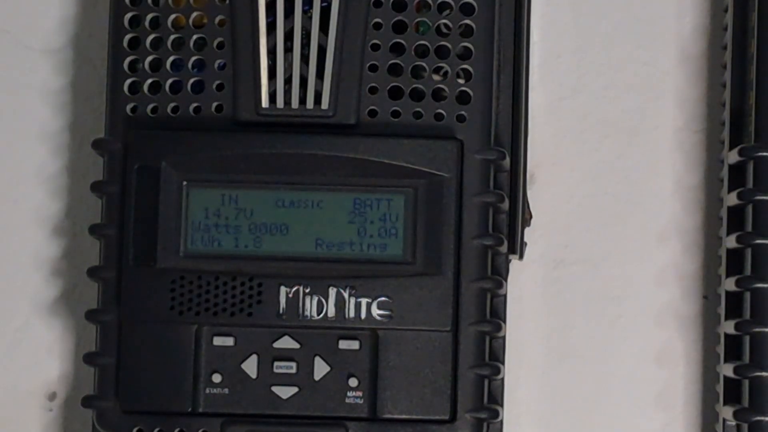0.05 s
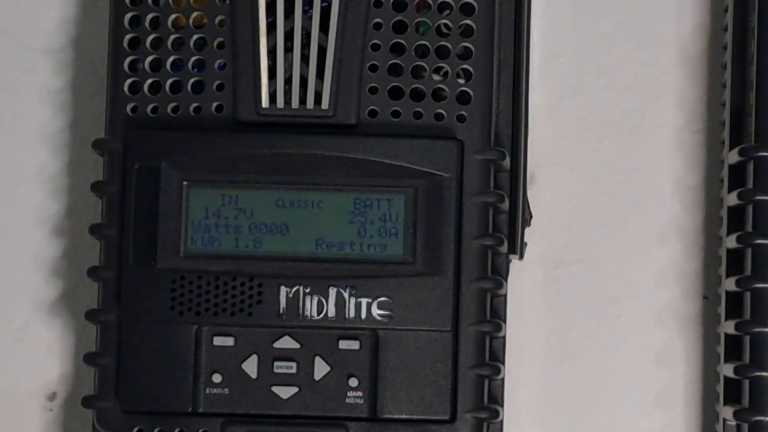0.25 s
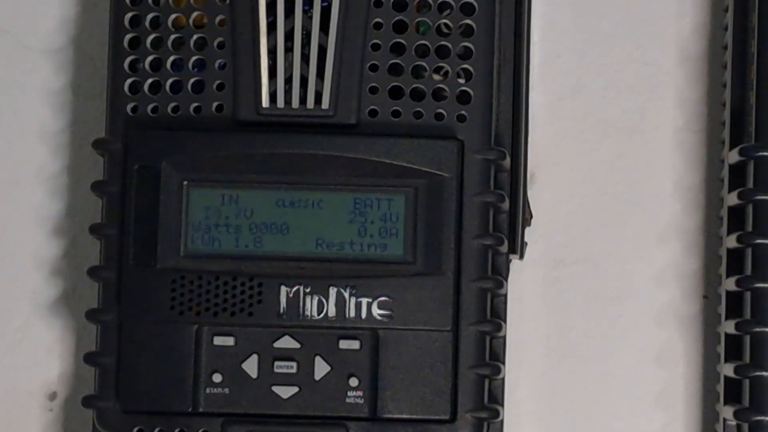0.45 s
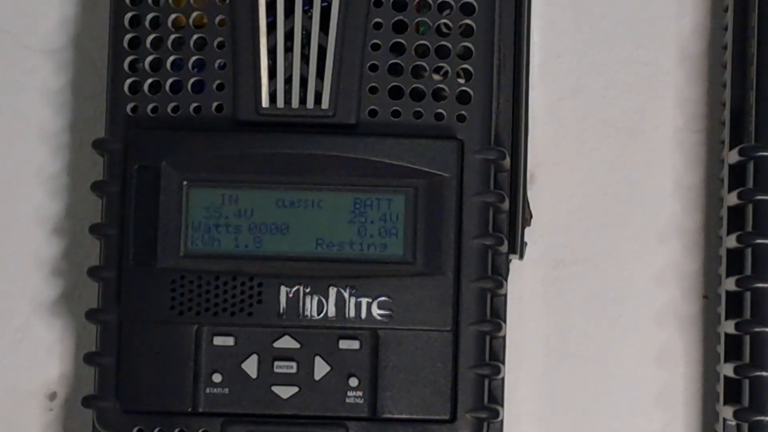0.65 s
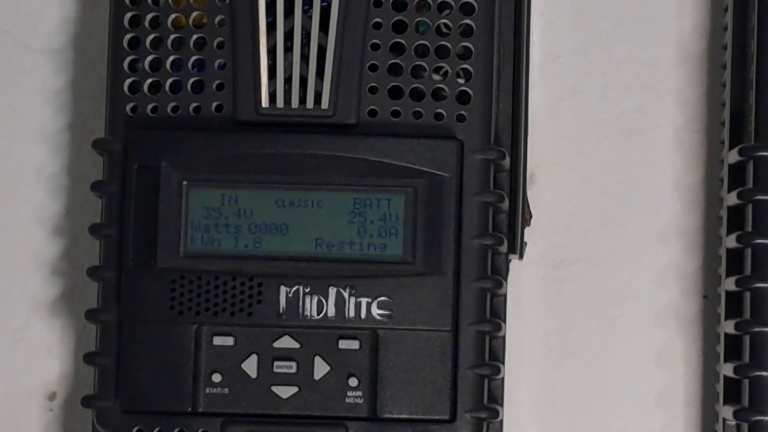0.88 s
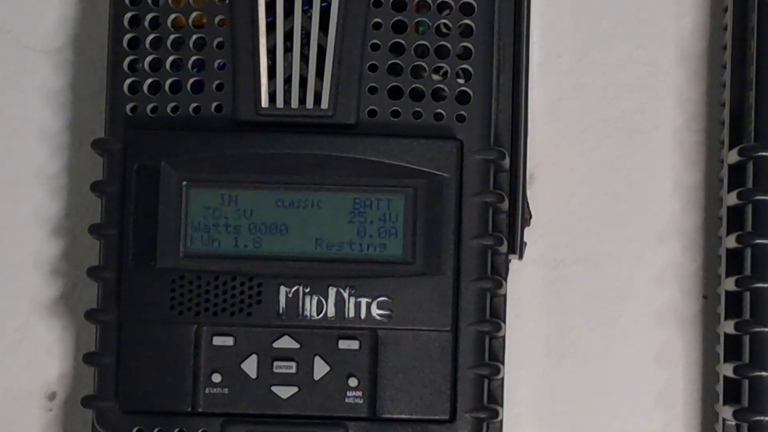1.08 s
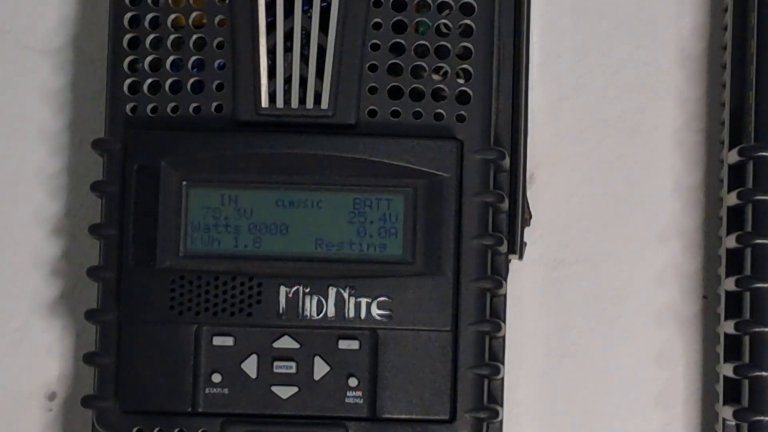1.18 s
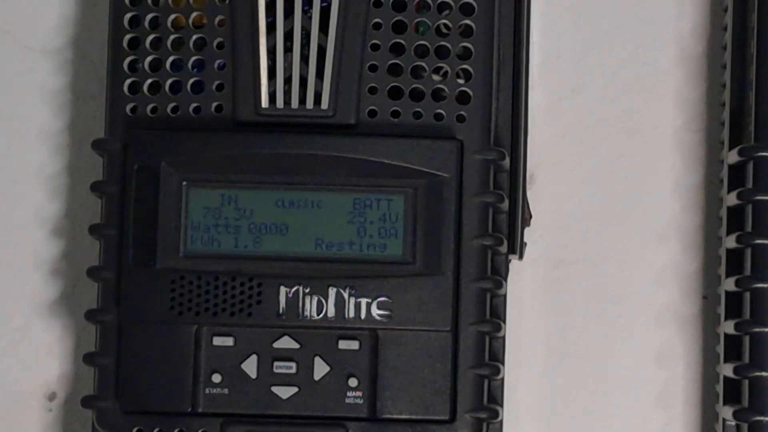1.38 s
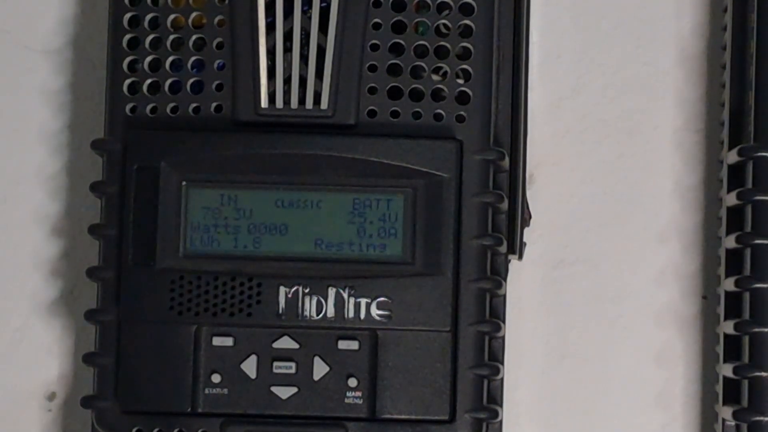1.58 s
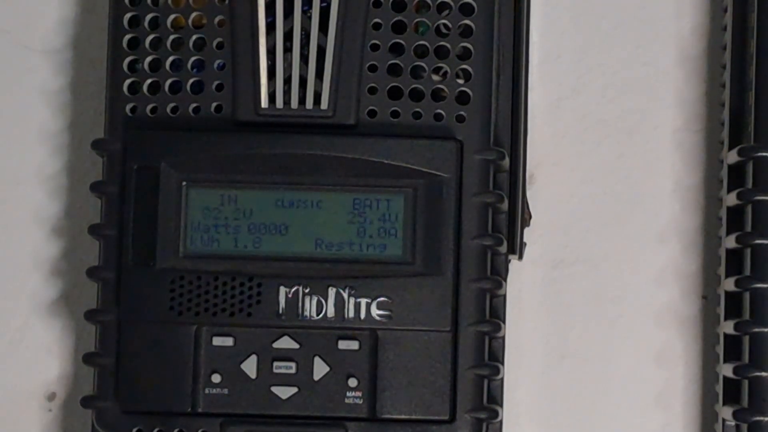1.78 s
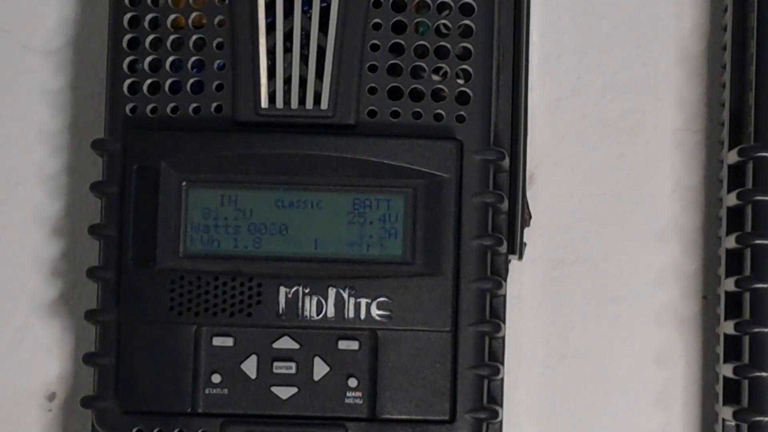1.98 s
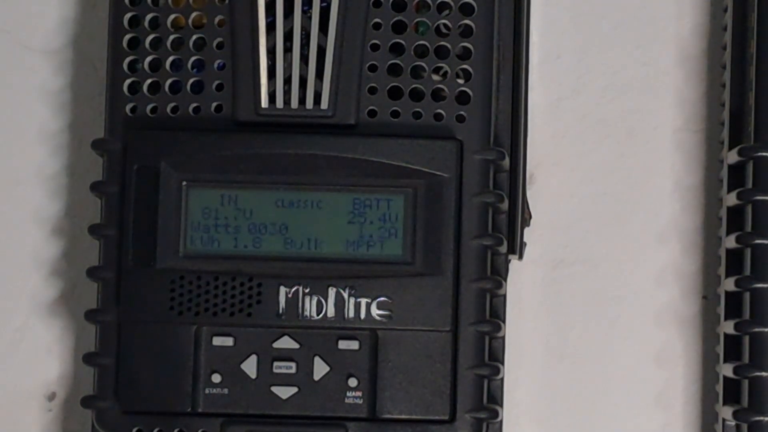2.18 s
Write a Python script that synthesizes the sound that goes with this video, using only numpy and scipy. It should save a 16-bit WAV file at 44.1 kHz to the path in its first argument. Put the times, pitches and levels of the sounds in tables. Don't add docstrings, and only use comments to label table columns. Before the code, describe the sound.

Heavy electrical breakers snapped over with loud metallic clacks in a bare, echoing utility room

```python
import sys
import numpy as np
from scipy import signal
from scipy.fft import rfft, irfft
from scipy.io import wavfile
from scipy.ndimage import uniform_filter1d

SR = 44100
rng = np.random.default_rng(int(sys.argv[2]) if len(sys.argv) > 2 else 0)


def volts_from_decibels(level):
    exponent = np.asarray(level, float) / 20
    return 10 ** exponent


def generate_wav(sig):
    pcm = np.round(np.clip(np.atleast_2d(sig).T, -1, 1) * 32767).astype(np.int16)
    wavfile.write(sys.argv[1], SR, pcm)


N = 99225

# (frequency [Hz], density [dB per Hz])
FAN_COLOUR = [(60, -3.5), (110, -9.5), (400, -24.5), (1500, -34), (7600, -45.5), (8300, -51.5),
              (12500, -44), (15800, -38), (16300, -86)]
# (frequency [Hz], left minus right [dB])
FAN_LEFT = [(60, -10), (240, -8.5), (950, 0.5), (3770, -3.5), (15000, -3)]
# (frequency [Hz], level [dB])
WHINE_TONES = [(11881, -78), (12000, -64), (12119, -78), (59.5, -63)]
# (frequency [Hz], density [dB per Hz])
SNAP_COLOUR = [(800, 6.5), (1300, -1.5), (2000, -2), (2500, -7), (7400, -3.5), (8100, -9.5), (10500, -3.5),
               (15700, -2), (16000, -35)]
# (frequency [Hz], width [Hz], level [dB])
LEVERS = [(1360, 573, 8.5), (1850, 69, -17.5), (2420, 390, 8.5), (2645, 230, -3), (3220, 240, -6.5),
          (3620, 1000, -1), (4540, 190, -5.5), (5360, 240, -4), (6560, 1500, -3), (7220, 190, -9.5),
          (12300, 3000, -8.5)]
# (time [s], level [dB], band from [Hz], band to [Hz], room send
# [dB])
SNAPS = [(0.084, -52, 600, 6300, 0.5), (0.2266, -4.5, 3230, 17200, 1.5), (0.445, -14.5, 2000, 16850, -3),
         (0.5037, -18, 2020, 16540, -0.5), (0.5081, -17.5, 4200, 16540, -15),
         (0.512, -24, 2000, 5200, -5.5), (0.792, -35.5, 1500, 6600, -3), (0.916, -52.5, 2434, 2840, 13),
         (0.929, -39.5, 2490, 2830, 0), (0.945, -41.5, 1090, 8700, 5), (0.981, -26.5, 900, 2900, 8.5),
         (0.987, -33, 2050, 5200, -16), (1.017, -27.5, 1000, 5010, -8.5), (1.045, -34, 1530, 5000, -11),
         (1.2079, -5, 2450, 16500, 11.5), (1.211, -8, 2320, 15930, -1.5), (1.216, -9.5, 5000, 15900, 5.5),
         (1.229, -7.5, 2877, 8850, 4), (1.237, -8.5, 2770, 9000, 7), (1.25, -10, 2306, 9000, -2.5),
         (1.266, -7.5, 1000, 8720, 0), (1.29, -4, 1000, 8200, -11), (1.513, -20.5, 1000, 3620, -5.5),
         (1.515, -24.5, 3030, 7370, -2.5), (1.668, -20.5, 2120, 7470, -5.5),
         (1.67, -31.5, 8800, 16630, 3.5), (1.669, -30.5, 2200, 2650, -10.5), (1.683, -39, 2237, 2435, -2.5),
         (1.704, -37.5, 2100, 2605, -15), (2.131, -61, 716, 1600, 6.5), (2.15, -63, 950, 1650, 4.5),
         (2.162, -67.5, 926, 1650, 1.5), (2.204, -50, 4240, 5300, -7),
         (0.228, -15.5, 1094, 2046, -0.5), (0.231, -16, 2100, 3390, 5), (0.506, -23, 1025, 2000, 0.5),
          (0.793, -53, 3800, 4250, -5.5), (0.796, -42.5, 1485, 2157, -0.5), (0.987, -30, 3900, 4760, -6),
          (0.992, -24.5, 850, 2850, -2.5), (1.019, -42, 4180, 4984, -2), (1.21, -19, 763, 1623, 4.5),
          (1.211, -19.5, 1380, 1600, 3.5), (1.213, -18, 2424, 2700, 2.5), (1.217, -17, 9300, 16900, -2),
          (1.514, -24, 1632, 2080, -1)]
# (frequency [Hz], level [dB], nominal t60 [s])
PANELS = [(190, -9.5, 0.05), (239, -4.5, 0.086), (319.4, 7.5, 0.098), (337.4, 7, 0.08), (373, 2.5, 0.089),
          (441, -2.5, 0.13), (485.8, -2, 0.12), (523.5, -0.5, 0.091), (646, 2.5, 0.057), (743, -5, 0.12),
          (815, -4.5, 0.16), (917, 1, 0.051), (1000, 0.5, 0.045), (1076, 2, 0.06)]
# (time [s], level [dB], centre [Hz], width [octaves], room send [dB])
KNOCKS = [(0.096, -51.5, 810, 1, 2), (0.228, -7, 575, 0.24, 5.5), (0.229, -11.5, 956, 0.67, 4.5),
          (0.25, -10, 817, 0.32, -10), (0.231, -14.5, 257.2, 0.23, 2.5), (0.503, -14.5, 585, 0.66, 2),
          (0.509, -3, 390, 0.34, 1), (0.509, -21, 1050, 0.47, 1), (0.531, -13.5, 715, 0.45, -7.5),
          (0.507, -23, 205, 0.33, 13), (0.64, -21.5, 425, 0.33, -3), (0.787, -18.5, 304, 0.58, 7),
          (0.788, -20, 754, 0.34, 5), (0.98, -26, 780, 0.5, 3), (0.987, -12.5, 336, 0.58, -3.5),
          (1.016, -15, 373, 0.47, -3.5), (1.209, -17.5, 384.3, 0.25, 5.5), (1.211, -14.5, 1026, 0.3, 6.5),
          (1.513, -16, 886, 0.27, 0.5), (1.514, -23.5, 626, 0.31, 4.5), (1.538, -22.5, 790, 0.4, -5.5),
          (1.565, -18.5, 382, 0.39, -9), (1.638, -24, 408, 0.75, -13), (1.516, -14, 350, 0.37, -2),
          (1.533, -29, 202, 0.31, -10), (2.129, -40.5, 243.5, 0.2, 7.5), (2.159, -43.5, 197, 0.56, 4),
          (2.206, -34, 210, 0.31, -5)]
# (frequency [Hz], t60 [s])
ROOM_T60 = [(200, 0.41), (500, 0.49), (1500, 0.45), (4000, 0.49), (8000, 0.44), (14000, 0.35)]
# (frequency [Hz], correlation [-1 to 1])
TAIL_LIKENESS = [(150, 0.54), (350, 0.87), (700, 0.41), (1400, 0), (8000, 0.0048)]
# (time [s], level [dB])
PUSHES = [
    (0.233, -35),
    (0.787, -39.5),
    (1.02, -37),
    (1.206, -36),
    (1.515, -46),
]

WHINE_LEFT_DB, WHINE_FLUTTER_DB = -19.5, 1
SNAP_RISE_S, SNAP_T60_S, LEVER_SPREAD_DB = 0.00053, 0.024, 5.5
CABINET_LOW_HZ = 177.8
LEFT_LAG_S, DIRECT_LEFT_DB = 0.00025, -7.5
ROOM_GAP_S, ROOM_RISE_S, ROOM_LEFT_DB = 0.0011, 0.0072, -1.5
PUSH_HZ, PUSH_T60_S = 90, 0.2
MIC_LOW_HZ, NOTCH_HZ, NOTCH_WIDTH_HZ = 48.3, 8280, 430
LIMIT_DB, RELEASE_DB_PER_S, LIMIT_ATTACK_S = -2, 198, 0.0024


def rms_one(x):
    return x / np.sqrt(np.mean(x ** 2) + 1e-20)


def at_hz(points, hz):
    table_hz, values = np.transpose(points)
    return np.interp(np.log(hz), np.log(table_hz), values)


def coloured(white, db_of_hz):
    n = white.shape[-1]
    hz = np.maximum(np.fft.rfftfreq(n, 1 / SR), 1)
    return irfft(rfft(white) * volts_from_decibels(db_of_hz(hz)), n)


def fan():
    left, right = rng.standard_normal((2, N))
    left = coloured(left, lambda hz: at_hz(FAN_COLOUR, hz) + at_hz(FAN_LEFT, hz))
    right = coloured(right, lambda hz: at_hz(FAN_COLOUR, hz))
    return volts_from_decibels(-52) * rms_one(np.array([left, right]))


def whine():
    t = np.arange(N) / SR
    flutter = rms_one(uniform_filter1d(rng.standard_normal(N), size=4000))
    tone = sum(volts_from_decibels(db + 8) * np.sin(2 * np.pi * hz * t) for hz, db in WHINE_TONES)
    return tone * volts_from_decibels(WHINE_FLUTTER_DB * flutter) * volts_from_decibels(np.array([[WHINE_LEFT_DB], [0]]))


def levers(x, luck):
    out = x.copy()
    for (hz, width_hz, db), own in zip(LEVERS, luck):
        r = np.exp(-np.pi * width_hz / SR)
        peak = [(1 - r * r) / 2, 0, (r * r - 1) / 2]
        poles = [1, -2 * r * np.cos(2 * np.pi * hz / SR), r * r]
        out += volts_from_decibels(db + LEVER_SPREAD_DB * own) * signal.lfilter(peak, poles, x)
    return out


def snaps():
    out = np.zeros((2, N + SR))
    t = np.arange(2048) / SR
    colour = lambda hz: at_hz(SNAP_COLOUR, hz)
    fade = volts_from_decibels(-60 * t / SNAP_T60_S) * (1 - np.exp(-(t / SNAP_RISE_S) ** 2))
    click = coloured(np.roll(t == 0, 64) * 1., colour)
    click *= np.sqrt(np.sum(fade ** 2) / np.sum(click ** 2))
    events = SNAPS
    draws = rng.standard_normal((len(events), len(t) + len(LEVERS)))
    for (s, db, low_hz, high_hz, room_db), draw in zip(events, draws):
        white, luck = draw[:len(t)], draw[len(t):]
        band = signal.butter(3, [low_hz, min(high_hz, .45 * SR)], "band", fs=SR, output="sos")
        burst = fade * rms_one(coloured(white, colour))
        pair = np.array([burst, volts_from_decibels(room_db) * click])
        size = volts_from_decibels(db - 3) * np.sqrt(16000 / (high_hz - low_hz))
        start = int(s * SR)
        out[:, start:start + len(t)] += size * levers(signal.sosfilt(band, pair), luck)
    return out[:, :N]


def ring(clicks, hz, t60):
    r = volts_from_decibels(-60 / (t60 * SR))
    w = 2 * np.pi * hz / SR
    return signal.lfilter([0, np.sin(w)], [1, -2 * r * np.cos(w), r * r], clicks + 1e-18)


def knocks():
    s, db, centre_hz, width, room_db = np.transpose(KNOCKS)
    out = np.zeros((2, N))
    luck = rng.normal(0, 1, (len(s), len(PANELS)))
    for k, (hz, level_db, t60) in enumerate(PANELS):
        clicks = np.zeros((2, N))
        off = np.log2(hz / centre_hz) / width
        size_db = db + level_db + 0.5 - 5.56 * off ** 2 + 0.83 * luck[:, k]
        size = volts_from_decibels(size_db) * (-1) ** k
        clicks[:, (s * SR).astype(int)] = size, size * volts_from_decibels(room_db)
        out += ring(clicks, hz, 0.55 * t60)
    return signal.sosfilt(signal.butter(4, CABINET_LOW_HZ, "high", fs=SR, output="sos"), out)


def direct(x):
    n = np.arange(N)
    left = volts_from_decibels(DIRECT_LEFT_DB) * np.interp(n - LEFT_LAG_S * SR, n, x)
    return np.array([left, x])


def room(x):
    t = np.arange(SR) / SR
    white = rng.standard_normal((2, 2, SR))
    tail = 0
    edges = 100 * 2 ** np.arange(0, 7.6, .5)
    for k, (low, high) in enumerate(zip(edges, edges[1:])):
        band = signal.butter(2, [low, high], "band", fs=SR, output="sos")
        mid, side = signal.sosfilt(band, white[k % 2])
        hz = np.sqrt(low * high)
        alike = np.clip(at_hz(TAIL_LIKENESS, hz), -1, 1)
        t60 = at_hz(ROOM_T60, hz)
        decay = volts_from_decibels(-60 * t / t60) / np.sqrt(t60 * SR / 14)
        pair = np.sqrt(1 + alike) * mid + np.sqrt(1 - alike) * side * [[1], [-1]]
        tail = tail + decay * pair
    tail = tail * (1 - np.exp(-np.maximum(t - ROOM_GAP_S, 0) / ROOM_RISE_S))
    return signal.fftconvolve(x[None], tail, axes=1)[:, :N] * volts_from_decibels(np.array([[ROOM_LEFT_DB], [0]]))


def pushes():
    s, db = np.transpose(PUSHES)
    clicks = np.zeros(N)
    clicks[(s * SR).astype(int)] = volts_from_decibels(db)
    lowpass = signal.butter(2, 2 * PUSH_HZ, fs=SR, output="sos")
    soft = signal.sosfilt(lowpass, ring(clicks, PUSH_HZ, PUSH_T60_S))
    return soft * volts_from_decibels(np.array([[-6.0], [1.5]]))


def scene():
    near, to_room = snaps() + knocks()
    return fan() + whine() + direct(near) + room(to_room) + pushes()


def band_limit(x):
    return signal.sosfilt(signal.butter(12, 17040, fs=SR, output="sos"), x)


def record(dry):
    t = np.arange(N) / SR
    x = signal.sosfilt(signal.butter(4, MIC_LOW_HZ, "high", fs=SR, output="sos"), dry)
    x = signal.lfilter(*signal.iirnotch(NOTCH_HZ, NOTCH_HZ / NOTCH_WIDTH_HZ, fs=SR), x)
    peak_db = 20 * np.log10(np.abs(x).max(axis=0) + 1e-9)
    over = np.maximum(peak_db - LIMIT_DB, 0)
    release = RELEASE_DB_PER_S * t
    held = np.maximum.accumulate(over + release) - release
    r = np.exp(-1 / (LIMIT_ATTACK_S * SR))
    reduction_db = signal.lfilter([1 - r], [1, -r], held)
    mix = np.clip(x * volts_from_decibels(-reduction_db), -1, 1)
    return band_limit(mix)


dry = scene()
out = record(dry)
generate_wav(out)
```